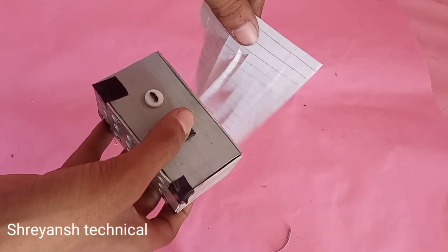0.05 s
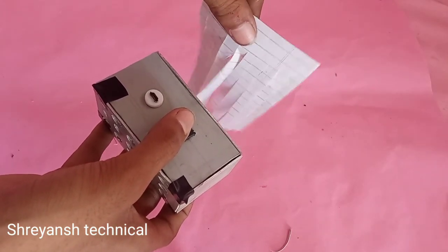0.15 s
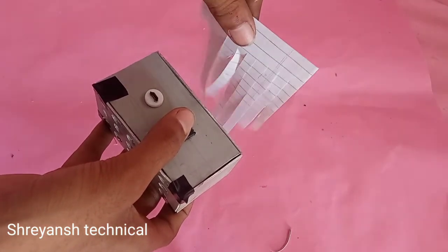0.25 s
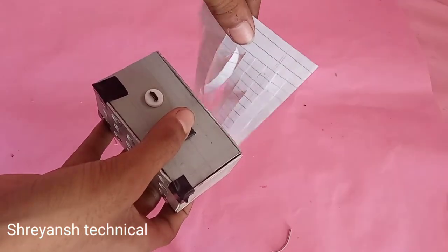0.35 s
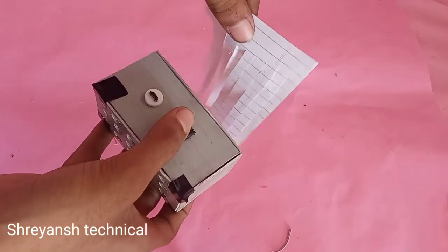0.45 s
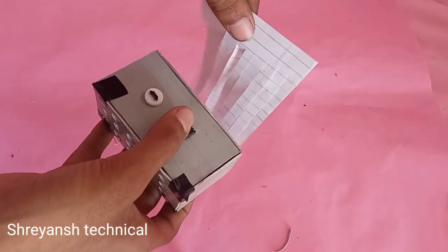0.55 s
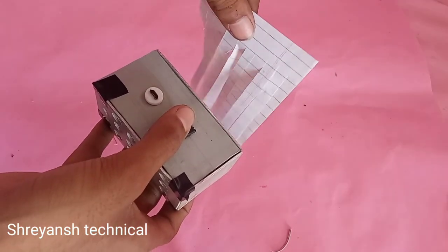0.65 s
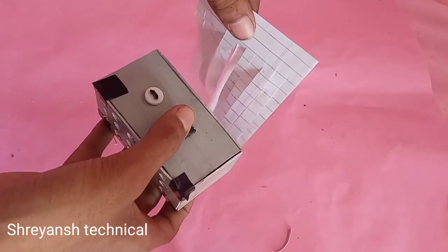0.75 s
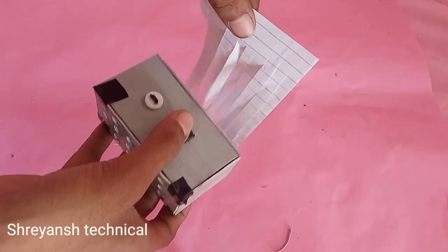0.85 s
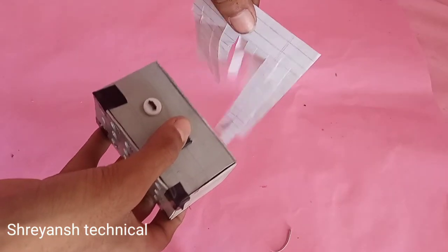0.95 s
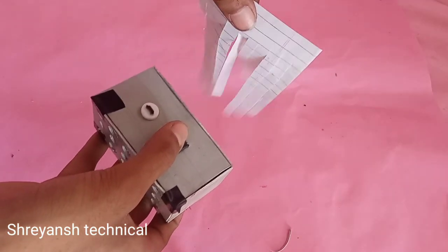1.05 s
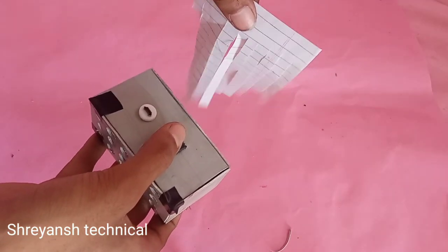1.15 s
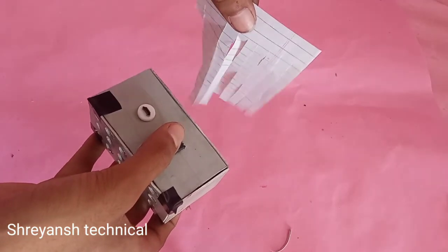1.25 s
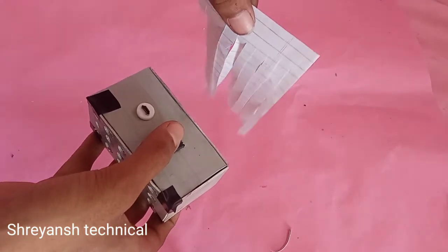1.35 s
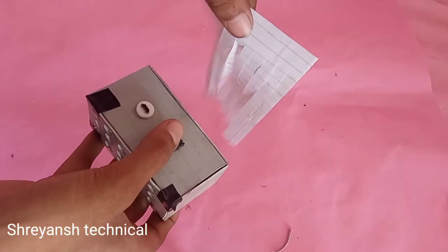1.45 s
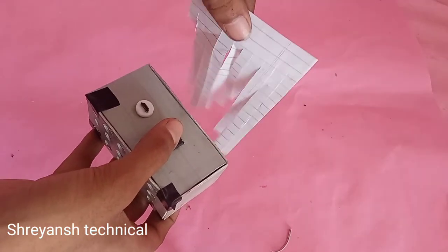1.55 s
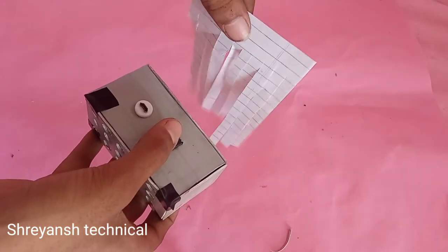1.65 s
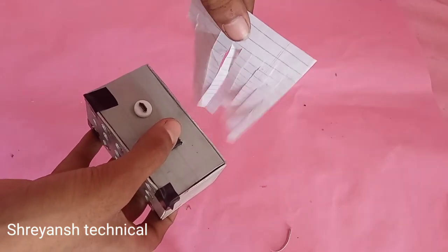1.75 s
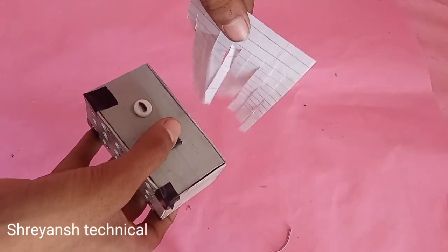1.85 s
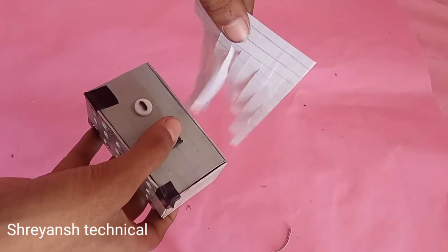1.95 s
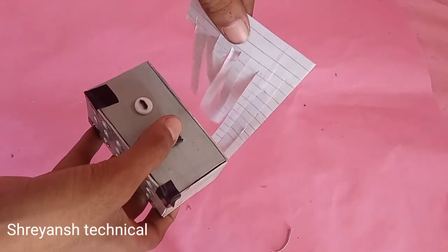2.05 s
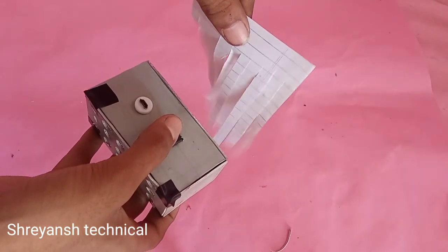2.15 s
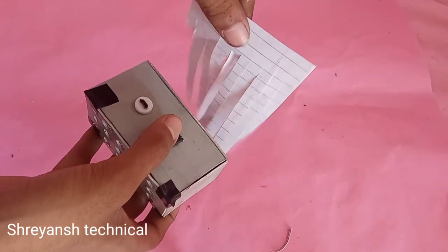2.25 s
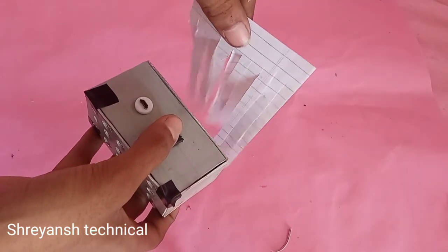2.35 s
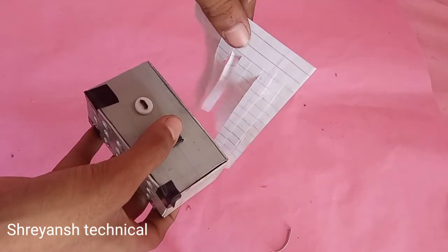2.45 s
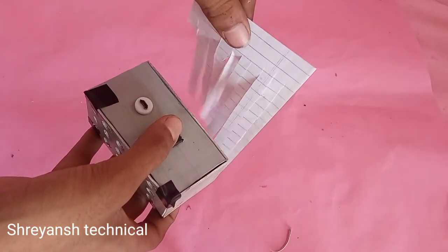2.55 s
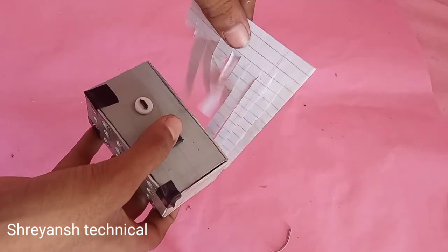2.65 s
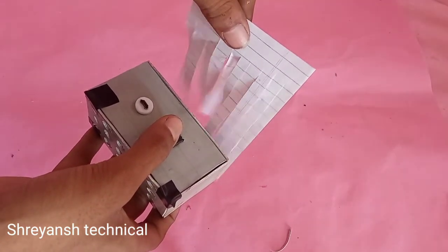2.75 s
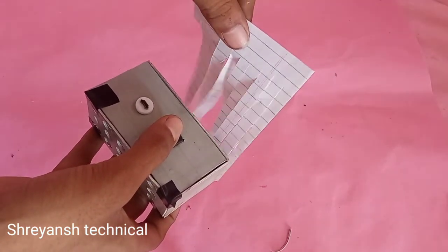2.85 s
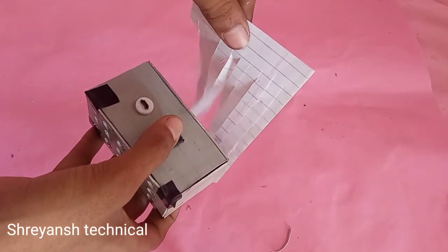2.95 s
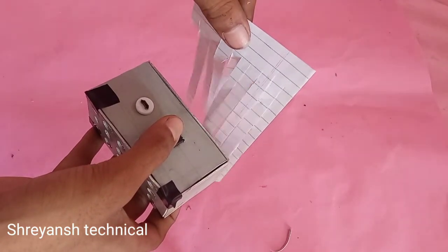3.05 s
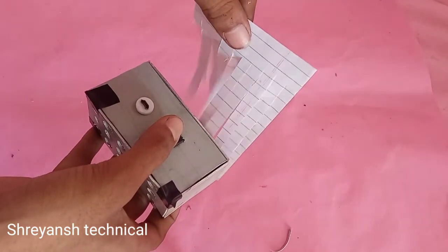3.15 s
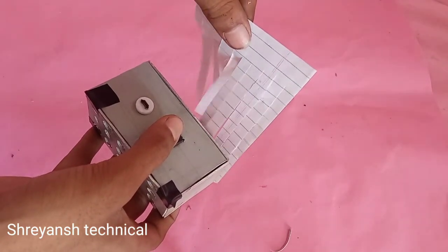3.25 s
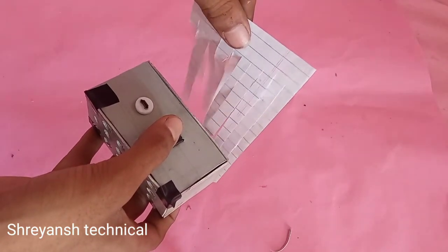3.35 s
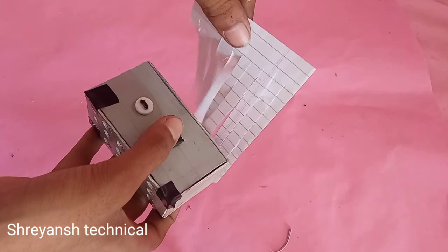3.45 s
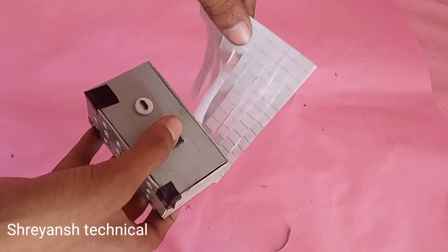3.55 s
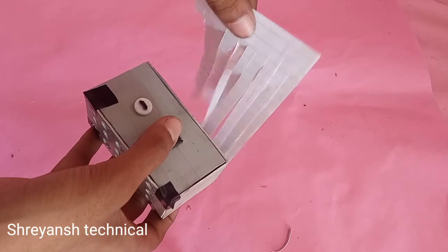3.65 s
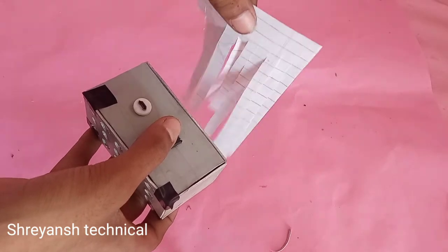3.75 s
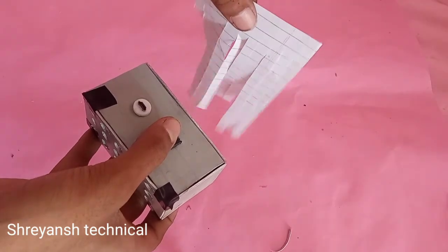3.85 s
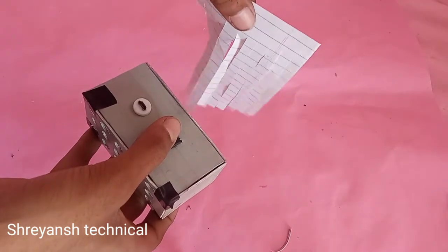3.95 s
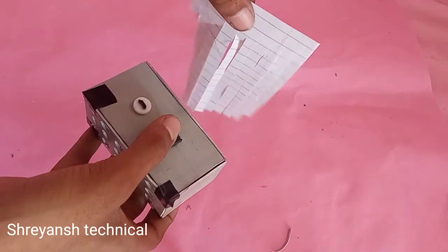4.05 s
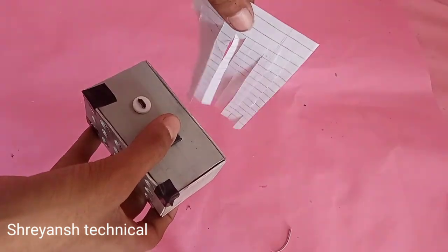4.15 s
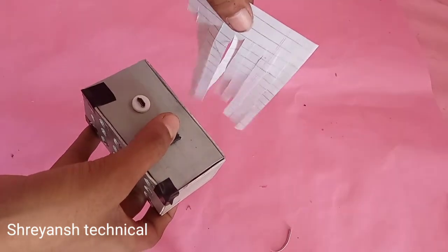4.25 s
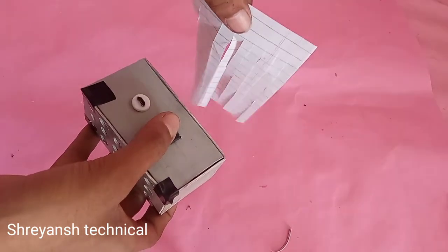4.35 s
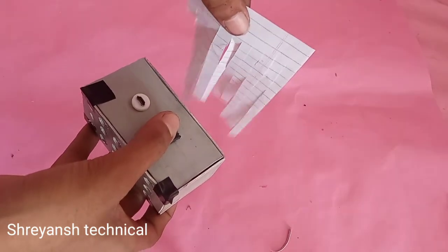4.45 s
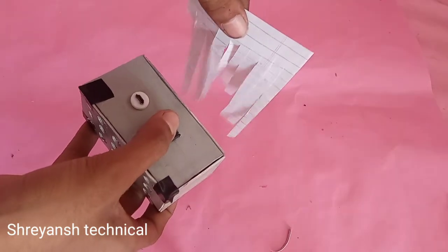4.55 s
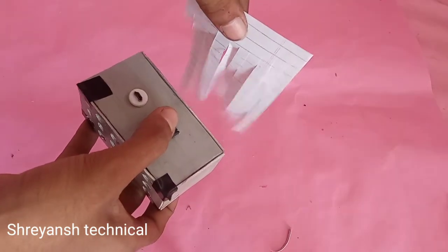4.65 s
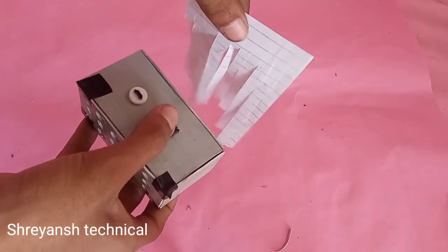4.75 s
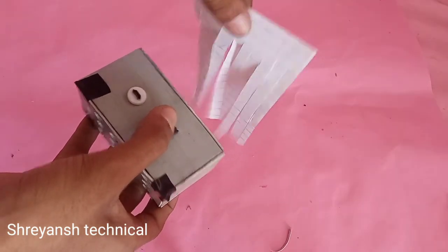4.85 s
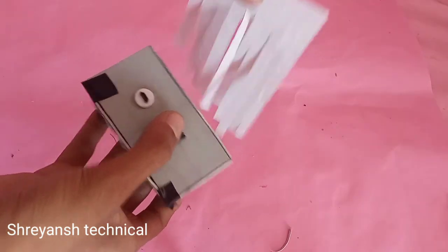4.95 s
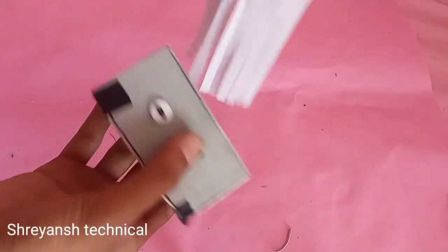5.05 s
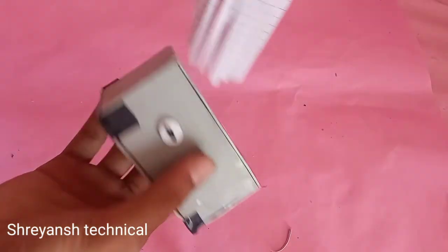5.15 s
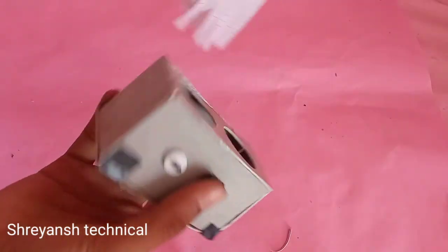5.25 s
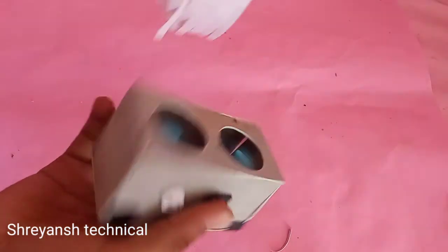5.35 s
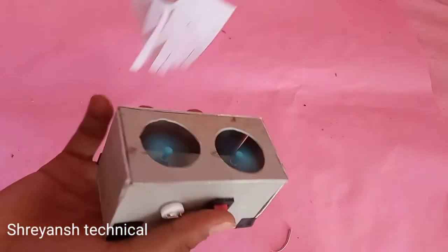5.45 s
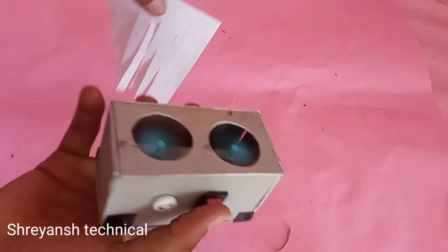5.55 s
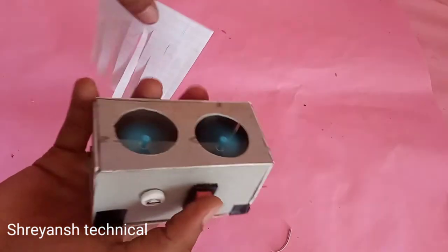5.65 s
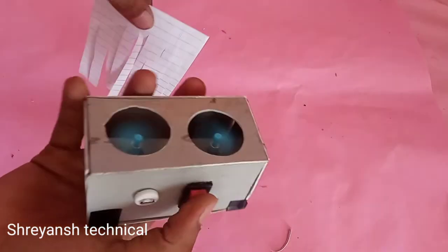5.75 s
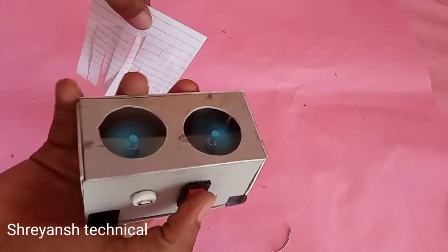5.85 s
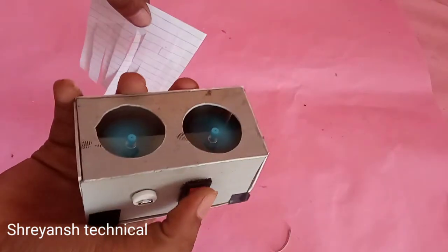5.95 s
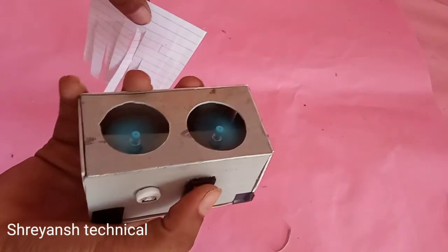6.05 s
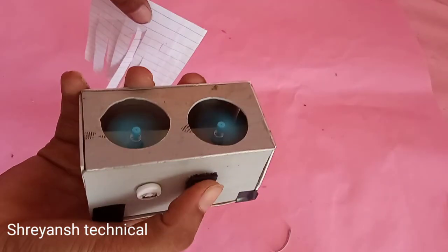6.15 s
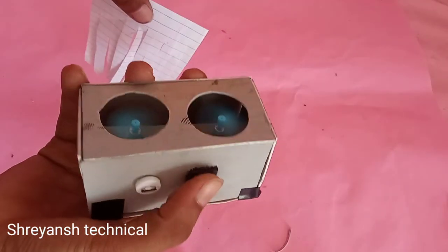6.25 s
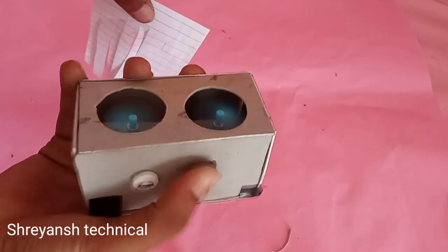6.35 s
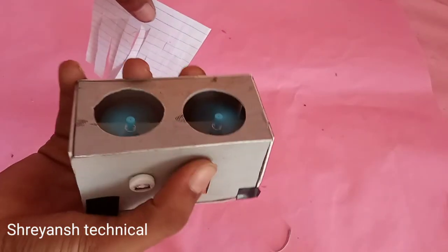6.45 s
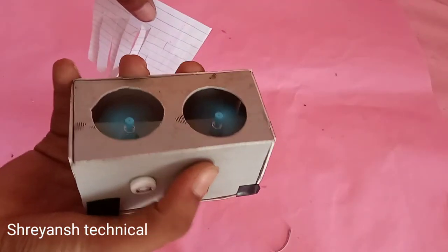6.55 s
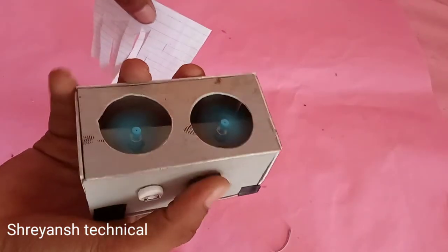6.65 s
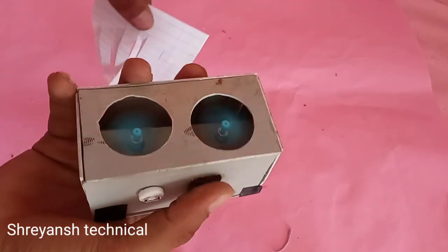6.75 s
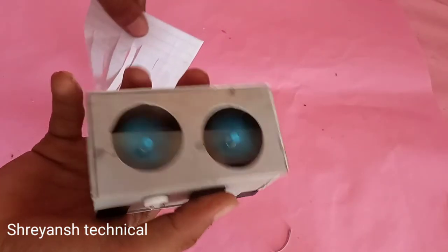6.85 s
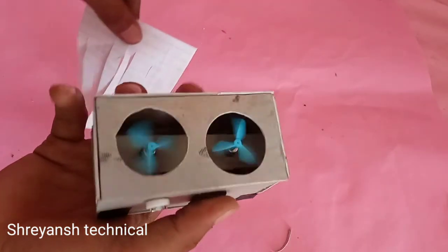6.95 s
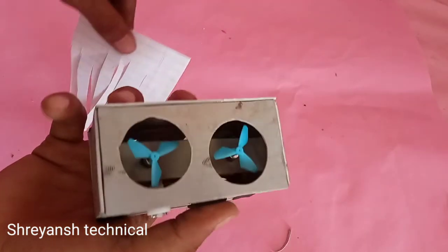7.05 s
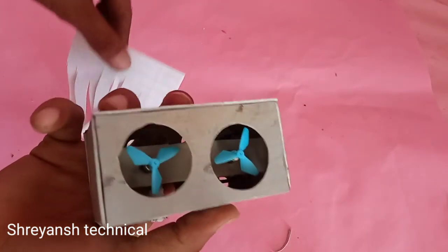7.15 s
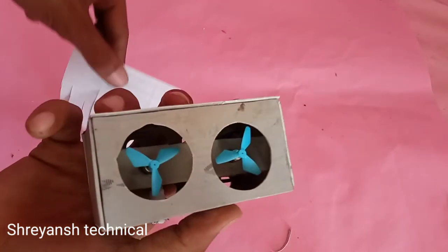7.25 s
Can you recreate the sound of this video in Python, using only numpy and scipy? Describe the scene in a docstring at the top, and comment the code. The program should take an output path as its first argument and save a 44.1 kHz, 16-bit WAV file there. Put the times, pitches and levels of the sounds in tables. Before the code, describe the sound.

From 0 s, in a small quiet room and very close to a single microphone, two tiny motors spinning three-blade plastic propellers whine continuously. Their main tones lie near 720 and 700 Hz, beating about 22 times a second as a rough flutter, with higher blade tones and buzzy overtones above. A broad hiss of air and brushes surrounds them, and the pitch wavers slightly with small dips and surges. Around 5.0-5.6 s the box is turned: the tones shift in balance and the hiss swells, louder and brighter. At about 6.45 s a sharp switch click cuts the power. The whine plunges and fades rapidly, with thin scraping, faint low grip rumble, then dry, grainy chatter slowing until a tiny tick near 6.96 s and standstill at 7.0 s. Only a faint low room murmur remains, with fingers softly brushing the box from about 7.2 s.

```python
"""A small quiet room, one microphone, and close to it a hand-held box in which two tiny motors spin propellers.
First both whine at about 700 turns a second, slightly apart so that they beat, over a hiss of air and brushes.
After five seconds the openings of the box turn to the microphone, and the hiss grows louder and brighter.
Then a switch clicks, air drag brakes the three-blade propellers, and the shafts scrape and chatter to a stop.
The grip shifts meanwhile, and fingers brush over the box at the end. Tones are oscillators, the rest shaped noise."""
import sys
import numpy as np
from scipy import signal
from scipy.fft import rfft, irfft
from scipy.io import wavfile
from scipy.ndimage import uniform_filter1d

SR = 44100
rng = np.random.default_rng(int(sys.argv[2]) if len(sys.argv) > 2 else 0)


def generate_wav(sig):
    """Save sig (samples, or channels by samples) to the path in sys.argv[1] as 16-bit PCM at SR."""
    pcm = np.round(np.clip(np.atleast_2d(sig).T, -1, 1) * 32767).astype(np.int16)
    wavfile.write(sys.argv[1], SR, pcm)


N = 321930
TIME = np.arange(N) / SR
FREQS = np.fft.rfftfreq(N, 1 / SR)


def amp(db):
    """Decibels to gain."""
    return 10 ** (np.asarray(db) / 20)


def unit(x):
    """Scales to rms 1."""
    return x / np.sqrt(np.mean(abs(x) ** 2) + 1e-20)


def follow(rows):
    """The columns of a curve table at every sample."""
    s, *columns = np.transpose(rows)
    return [np.interp(TIME, s, column) for column in columns]


def read(points, hz=FREQS):
    """A spectrum table on a log-frequency axis."""
    f, value = np.transpose(points)
    return np.interp(np.log(hz + 1), np.log(f), value)


def colour(x, gain):
    """Filters x by a gain per frequency; rms 1."""
    return unit(irfft(rfft(x) * gain, N))


def noise(gain):
    """Noise with the given gain per frequency; rms 1."""
    return colour(rng.standard_normal(N), gain)


def wander(rate_hz):
    """Random drift up to about the given rate; rms 1."""
    return noise(1 / (1 + (FREQS / rate_hz) ** 2))


def bell(hz, width_hz):
    """Power curve of one resonance."""
    return 1 / (1 + (2 * (FREQS - hz) / width_hz) ** 2)


def boost(modes):
    """Gain in dB of a set of resonances."""
    return sum(db * bell(hz, width) for hz, width, db in modes)


# Low murmur of the place. Each row: frequency in Hz, relative density in dB per Hz.
AMBIENCE_SPECTRUM = [(18, -55), (30, -28.5), (136, -3), (247, 1.5), (320, -10.5), (364, -2.5), (881, -20.5),
                     (1690, -27), (3500, -33), (15000, -48)]


def ambience(level_db):
    """Steady noise of the place, strongest in the low range."""
    return amp(level_db) * noise(amp(read(AMBIENCE_SPECTRUM)))


# How long the small room rings. Each row: frequency in Hz, time to fall by 60 dB in seconds.
ROOM_DECAY = [(200, 0.44), (1000, 0.55), (4000, 0.37), (14000, 0.32)]


def room(x):
    """A short diffuse tail, dying faster in the treble."""
    hz, t, z = signal.stft(rng.standard_normal(SR // 2), SR, nperseg=256)
    decay_db = -60 * t / read(ROOM_DECAY, hz)[:, None]
    late = t > .004  # leaves out the very start
    tail = signal.istft(z * amp(decay_db) * late, SR, nperseg=256)[1]
    return signal.fftconvolve(x, tail / np.linalg.norm(tail))[:N]


# The hand shifts its grip. Each row: centre in seconds, length in seconds, level of the rumble in dB.
GRIP_SHIFTS = [(6.568, .15, -68), (6.857, .08, -69.5)]
# Fingers on the box. Each row: frequency in Hz, relative density in dB per Hz.
FINGER_SPECTRUM = [(80, -16), (200, 18), (500, -2.5), (1100, -2), (2000, -16), (4500, -13), (7500, -22),
                   (9600, -19.5), (12000, -31.5)]
FINGERS_S, FINGERS_RISE_S, FINGERS_DB = 7.175, .025, -74  # start, rise and level of the brush


def hand(grip_hz):
    """Low rumble of the grip and a soft brush of fingers on the box."""
    grip = sum(amp(db) * np.exp(-(2 * (TIME - s) / length) ** 2) for s, length, db in GRIP_SHIFTS)
    brush = amp(FINGERS_DB) * np.clip((TIME - FINGERS_S) / FINGERS_RISE_S, 0, 1)
    return grip * noise(bell(grip_hz, 30) ** 2) + brush * noise(amp(read(FINGER_SPECTRUM)))


# The switch, then a small tick. Each row: start in seconds, peak level in dB.
CLICK_TIMES = [(6.444, -19), (6.961, -47)]
# Colour of both. Each row: frequency in Hz, relative density in dB per Hz.
CLICK_SPECTRUM = [(100, -17), (600, -5.5), (2000, -6), (5000, 11), (10000, -9), (15000, 0)]


def clicks(decay_s):
    """The switch snaps off, and a small tick follows shortly before the rotors stop: decaying noise bursts."""
    out = np.zeros(N)
    for s, db in CLICK_TIMES:
        burst = noise(amp(read(CLICK_SPECTRUM))) * (TIME >= s) * np.exp(-abs(TIME - s) / decay_s)
        out += amp(db) * burst / abs(burst).max()
    return out


# Switch-off, time from there to a standstill, and time in which air drag alone halves the speed.
OFF_S, COAST_S, DRAG_S = 6.447, .565, .106


def coasting():
    """Share of full speed: air drag brakes hard at first, friction brings the stop."""
    since = np.maximum(TIME - OFF_S, 0)
    return np.maximum(1 - since / COAST_S, 0) / (1 + since / DRAG_S)


# The box turned in the hand. Each row: time in seconds, how far the openings face the microphone from 0 to 1.
FACING_CURVE = [(0, 0.16), (4.9, 0.08), (5.2, 0.4), (5.6, 0.98), (6.45, 0.94)]


def facing():
    """How far the openings face the microphone, 0-1."""
    return np.clip(follow(FACING_CURVE)[0], 0, 1)


# Colour of the bearings. Each row: frequency in Hz, relative density in dB per Hz.
RATTLE_SPECTRUM = [(100, -26), (350, -13), (540, -1), (750, -7), (1150, 0.5), (1400, -4.5), (1900, -0.5),
                   (2400, -4), (3400, -2), (4500, -1), (7000, -12), (10000, -12), (11500, -25),
                   (15000, -28)]
# Modes that the rattle rings. Each row: frequency in Hz, width in Hz, boost in dB.
RATTLE_MODES = [(1730, 120, 7.5), (3300, 160, 6)]
SCRAPE_DB, SCRAPE_SHARE = -45, 0.57  # level, and share of full speed below which the scrape fades
CHATTER_DB, CHATTER_POWER = -36.3, 0.64  # level, and power of the speed by which the chatter fades
CHATTER_SHARE, CHATTER_ONSET = 0.099, 0.029  # share of full speed at which it sets in, width of that onset


def rattle(angles, ticks_per_s, grit, pulsing, uneven_db):
    """Coasting shafts scrape, then chatter with random ticks, pulsing each turn and fading with their speed."""
    share = coasting()
    scrape = amp(SCRAPE_DB) * np.minimum(share / SCRAPE_SHARE, 1) ** 2 * (TIME > OFF_S)
    onset = (1 + np.tanh((CHATTER_SHARE - share) / (2 * CHATTER_ONSET))) / 2
    chatter = amp(CHATTER_DB) * share ** CHATTER_POWER * onset
    ticks = unit(rng.choice([-1., 1.], N) * (rng.random(N) < ticks_per_s / SR))
    gate = (1 + pulsing * np.cos(angles).sum(0)) * amp(uneven_db * wander(20))
    grain = (rng.standard_normal(N) + grit * ticks) * gate
    return np.hypot(scrape, chatter) * colour(grain, amp(read(RATTLE_SPECTRUM) + boost(RATTLE_MODES)))


# Brushes on the commutators. Each row: frequency in Hz, relative density in dB per Hz.
SLIDE_SPECTRUM = [(3000, -42.5), (7600, -11.5), (8400, -14), (8900, 6.5), (9600, -6.5), (10700, -10),
                  (11400, -15.5), (14200, -23), (15300, -7.5)]


def slide(level_db):
    """Thin hiss of the brushes, which slide on until the shafts have almost stopped."""
    speed_gain = np.sqrt(np.maximum(coasting() - .012, 0))
    return amp(level_db) * noise(amp(read(SLIDE_SPECTRUM))) * speed_gain


# Air resonances of the box. Each row: frequency in Hz, width at half power in Hz, relative level in dB.
BOX_MODES = [(1447, 175, -3), (1580, 74, -5.5), (1600, 44, 1.5), (1742, 57, 3), (1855, 87, 0),
             (1930, 30, -6), (1994, 53, 2), (2102, 150, 1)]


def box(level_db, drift_db):
    """Turbulence from the blades rings the air in the box."""
    # squaring the bell narrows it; 1.55 makes up for that
    power = sum(amp(db) ** 2 * bell(hz, 1.55 * width) ** 2 for hz, width, db in BOX_MODES)
    return amp(level_db + drift_db * wander(4.8)) * noise(np.sqrt(power)) * coasting() ** 3.0


# Rush of air and brushes, openings turned away from the microphone, then facing it.
# Each row: frequency in Hz, relative density in dB per Hz.
AWAY_SPECTRUM = [(30, -27.5), (55, -26), (75, -12.5), (160, -2.5), (350, -2), (850, 1), (1250, 3),
                 (2500, -1), (3300, -1.5), (6000, -2), (8100, -7.5), (10500, -8.5), (13500, -14.5),
                 (16000, -26)]
FACING_SPECTRUM = [(30, -32), (55, -30), (75, -18), (160, -3.5), (400, 1.5), (850, -6.5), (1250, 1),
                   (2400, -2), (3200, -5.5), (4400, 0.5), (5500, -2), (7800, -7), (10500, -3),
                   (13500, -16.5)]
# Ringing of the motor cans and brush springs. Each row: frequency in Hz, width in Hz, boost in dB.
CAN_MODES = [(4170, 680, 3.5), (4860, 27, 2.5), (6460, 270, 4.5), (9450, 1100, 6.5), (14800, 820, 9),
             (15020, 780, 10)]
RUSH_DB, RUSH_FACING_DB = -37.5, 4.5  # level when turned away, and gain as the openings face the microphone


def rush(angles, pulsing, throb):
    """Broad hiss, pulsing with each turn of the shafts and coloured by the motor cans."""
    fast, slow = angles
    # swells as the shafts fall into step
    gate = 1 + pulsing * (np.cos(fast) + np.cos(slow)) + throb * np.cos(fast - slow)
    hiss = rng.standard_normal(N) * gate * amp(0.86 * wander(130))
    turned = facing()
    away = colour(hiss, amp(read(AWAY_SPECTRUM) + boost(CAN_MODES)))
    toward = colour(hiss, amp(read(FACING_SPECTRUM) + boost(CAN_MODES)))
    mix = (1 - turned) * away + turned * toward
    return amp(RUSH_DB + RUSH_FACING_DB * turned) * mix * coasting() ** 3.2


# Both motors speed up and sag together. Each row: time in seconds, shaft speed of the faster one in Hz.
SPEED_CURVE = [(0, 724.2), (0.87, 721.4), (1, 712.8), (1.11, 723.7), (1.4, 722.6), (1.51, 716),
               (1.95, 723.7), (2.3, 717.7), (2.53, 717.7), (2.62, 724), (2.75, 718.2), (3.55, 721.4),
               (3.73, 715.6), (3.83, 720.8), (4.95, 716), (5.42, 707.7), (6.17, 709.2), (6.42, 721)]
# The slower motor's lag sets the rate of the beat. Each row: time in seconds, lag in Hz.
LAG_CURVE = [(0, 22.65), (.8, 20.97), (1.6, 22.48), (4, 22.53), (4.5, 20.8), (5, 22.49), (6.45, 22.16)]
WOBBLE_HZ, WOBBLE_RATE_HZ = 1.2, 6.97  # quick shared unsteadiness of the speed: rms depth and rate
SURGE_DB_PER_HZ, SETTLE_S = 0.7, 1.2  # tones swell as the speed rises above its average over this time


def supply():
    """One supply drives both: running speed of each motor in Hz, and the swell in dB with each surge."""
    fast_hz = follow(SPEED_CURVE)[0] + WOBBLE_HZ * wander(WOBBLE_RATE_HZ)
    surge_hz = fast_hz - uniform_filter1d(fast_hz, round(SETTLE_S * SR))
    return fast_hz, fast_hz - follow(LAG_CURVE)[0], SURGE_DB_PER_HZ * surge_hz


# Loudness of each motor as the box moves in the hand.
# Each row: time in seconds, unbalance tone in dB, blade tone in dB.
FAST_LEVELS = [(0, -34, -42.5), (.95, -35, -39.5), (1.2, -37, -39), (4.1, -38, -40.5), (4.98, -42.5, -58),
               (5.2, -34, -42), (5.85, -38.5, -41.5), (6.45, -42, -45.5)]
SLOW_LEVELS = [(0, -41.5, -57), (1.3, -44.5, -38), (3.6, -45, -40), (5.03, -48, -39.5), (5.189, -35, -37.5),
               (6.05, -38.5, -39), (6.45, -37, -39)]
# Overtones of each motor. Each row: multiple of the shaft speed, level in dB, roughness from 0 to 1,
# change in dB as the openings face the microphone.
FAST_OVERTONES = [(2, -46.5, 0.1, 0), (4, -54, .6, 0.5), (5, -54, 0.47, 4), (6, -47.5, 1, -1.5),
                  (7, -48, 0.43, -3), (9, -54.5, 0.9, 1), (11, -68.5, .3, -2), (13, -63, .8, -6.5)]
SLOW_OVERTONES = [(2, -52.5, 1, 0), (4, -52.5, 0.47, -0.5), (5, -61.5, .45, 4), (6, -50, .8, -1),
                  (7, -51, 1, 0.5), (9, -56.5, 0.64, 0.5)]
# How well the box passes on each tone as the speed drops.
# Each row: share of full speed, gain of the unbalance tone in dB, gain of the blade tone in dB.
BOX_RADIATION = [(0, -90, -90), (.38, -60, -50), (.45, -30, -20), (.51, -21, -8), (.61, -17, -5),
                 (.73, -24, 1), (.83, -22, -15), (.93, -15, -8), (1, 0, .6)]


def motor(speed_hz, swell_db, tones, whine, flutter_hz, blade_rough, smear_hz, waver_db):
    """Unbalance sounds once a turn, the blades three times; brushes and shaft play add rough overtones."""
    shaft_db, blade_db = follow(tones) + swell_db
    share = coasting()
    turning_hz = (speed_hz + flutter_hz * wander(24.95)) * share
    angle = 2 * np.pi * np.cumsum(turning_hz) / SR

    def partial(order, rough):
        """One multiple of the shaft speed, partly smeared into a narrow band."""
        rough = np.clip(rough, 0, 1)
        smear = unit(wander(smear_hz * order) + 1j * wander(smear_hz * order))
        envelope = np.sqrt(1 - rough) + np.sqrt(rough) * smear
        return np.sqrt(2) * (envelope * np.exp(1j * order * angle)).real

    shares, *columns = np.transpose(BOX_RADIATION)
    shaft_gain_db, blade_gain_db = (np.interp(share, shares, column) for column in columns)
    tremble_db = .7 * wander(12)
    shaft = amp(shaft_db + shaft_gain_db + tremble_db) * np.sqrt(2) * np.cos(angle)
    blade_level = amp(blade_db + blade_gain_db + waver_db * wander(5))
    blades = blade_level * partial(order=3, rough=blade_rough)
    turned = facing()
    overtones = np.zeros(N)
    for order, db, rough, facing_db in whine:
        level = amp(db + facing_db * turned + 1.45 * wander(2.5))
        overtones += level * partial(round(order), rough)
    return shaft + blades + overtones * share ** 5, angle


def scene():
    """Both motors, their noises, the hand, the switch and the room, the same in both channels."""
    fast_hz, slow_hz, swell_db = supply()
    fast, fast_angle = motor(fast_hz, swell_db, FAST_LEVELS, FAST_OVERTONES,
                             flutter_hz=1.136, blade_rough=0.066, smear_hz=8.9, waver_db=1.1)
    # the slower motor swells less with each surge
    slow, slow_angle = motor(slow_hz, 0.3 * swell_db, SLOW_LEVELS, SLOW_OVERTONES,
                             flutter_hz=1.41, blade_rough=0.31, smear_hz=13.6, waver_db=1.8)
    angles = [fast_angle, slow_angle]
    air = rush(angles, pulsing=0.096, throb=0.043) + box(level_db=-37, drift_db=.5)
    bearings = rattle(angles, ticks_per_s=730, grit=0.84, pulsing=0.14, uneven_db=1.4)
    noises = air + slide(level_db=-52) + bearings + clicks(decay_s=.002)
    echo = room(amp(-14.5) * noises + amp(-18) * (fast + slow))
    mono = fast + slow + noises + echo + hand(grip_hz=72.6) + ambience(level_db=-74)
    return np.array([mono, mono])


def record(dry):
    """The recorder's band limit: a steep low-pass at 15560 Hz."""
    lowpass = signal.firwin(1023, 15560, window=("kaiser", 9), fs=SR)
    return signal.oaconvolve(dry, lowpass[None], "same")


dry = scene()
out = record(dry)
generate_wav(out)
```